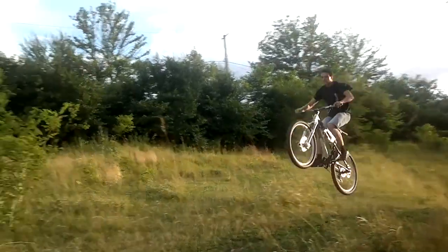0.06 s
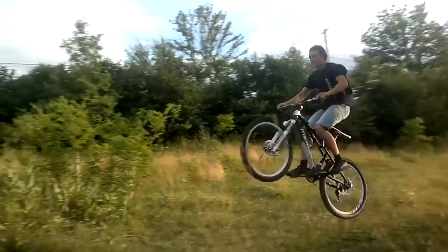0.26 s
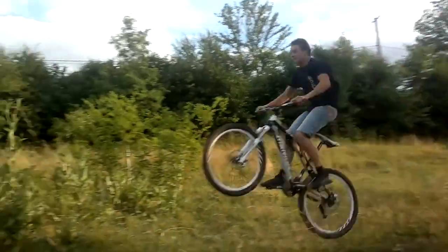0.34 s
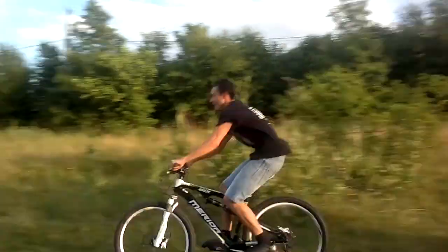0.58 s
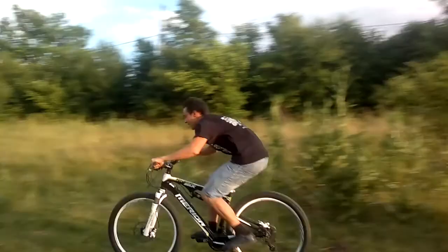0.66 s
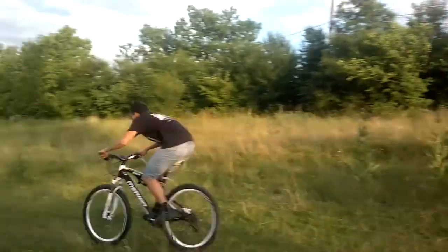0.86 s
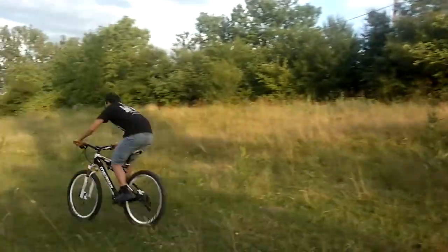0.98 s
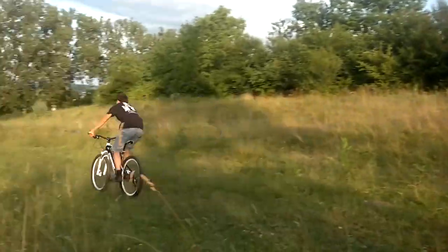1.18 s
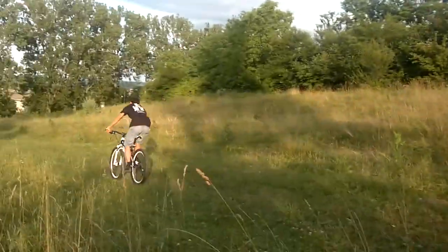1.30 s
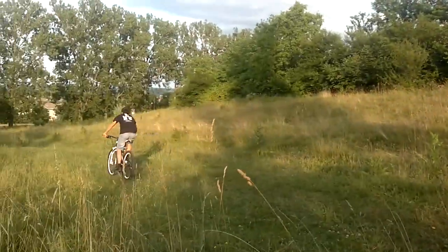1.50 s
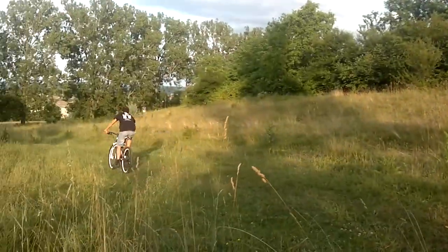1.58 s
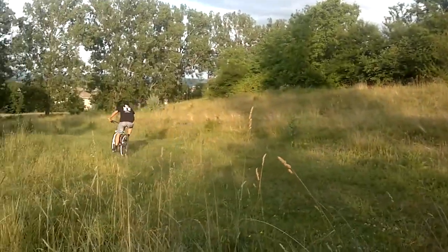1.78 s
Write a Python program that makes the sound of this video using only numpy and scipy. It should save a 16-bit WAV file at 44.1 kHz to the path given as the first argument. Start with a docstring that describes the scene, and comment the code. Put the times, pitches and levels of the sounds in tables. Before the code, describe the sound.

Mountain bike thumping down from a jump, chain jingling and tyres rustling away through grass.

```python
"""In a meadow, a mountain bike lands from a jump close to the microphone and rolls away.
The rear wheel hits with a thump and a hard clack of the frame, and the front follows.
The chain slaps and jingles ever more weakly, and there is one thin, very high squeak.
Knobbly tyres hum and rustle through the grass; wind stirs a hedge and buffets the microphone."""
import sys
import numpy as np
from scipy import signal
from scipy.fft import rfft, irfft, next_fast_len
from scipy.io import wavfile
from scipy.ndimage import uniform_filter1d, map_coordinates

SR = 44100
rng = np.random.default_rng(int(sys.argv[2]) if len(sys.argv) > 2 else 0)


def to_wav(sig):
    """Store sig (one row per channel, or 1-D mono) as 16-bit WAV at the path in sys.argv[1].

    Samples outside -1..1 are clipped; the rate is SR.
    """
    pcm = np.clip(np.atleast_2d(sig), -1, 1) * 32767
    pcm = np.round(pcm).astype(np.int16)
    wavfile.write(sys.argv[1], SR, pcm.T)  # frames by channels


N = 81585


def amp(db):
    """Turn decibels into a number to multiply by."""
    return 10 ** (np.asarray(db) / 20)


def unit(x):
    """Scale x to an average (rms) strength of 1."""
    return x / np.sqrt(np.mean(x ** 2) + 1e-20)


def clock():
    """The time of each sample, in seconds."""
    return np.arange(N) / SR


def loudness(points):
    """A volume curve through (t/s, level/dB) points."""
    times, db = np.transpose(points)
    return amp(np.interp(clock(), times, db))


def flutter(depth_db, per_s):
    """A smooth, random flicker in volume."""
    return amp(depth_db * map_coordinates(rng.standard_normal(400), [clock() * per_s], mode="wrap"))


def filtered(x, response):
    """Multiply each frequency in x by response(hz)."""
    size = next_fast_len(N + SR // 2)
    return irfft(rfft(x, size) * response(np.fft.rfftfreq(size, 1 / SR)), size)[:N]


def coloured(x, tone):
    """Shape x with (f/Hz, gain/dB) points, then scale it to strength 1."""
    f, db = np.transpose(tone)
    return unit(filtered(x, lambda hz: amp(np.interp(np.log(hz + 1), np.log(f), db))))


def fuzzy_tone(hz, width_hz):
    """Noise squeezed into a narrow band, so it has a pitch."""
    return unit(filtered(rng.standard_normal(N), lambda f: 1 / (1 + (2 * (f - hz) / width_hz) ** 2)))


def steadied(x, window_s):
    """Even out the chance swells in a noise."""
    power = uniform_filter1d(x ** 2, max(2, int(window_s * SR)))
    return unit(x / np.sqrt(np.abs(power) + 1e-4))


def crackle(per_s, smooth):
    """Tiny random ticks mixed with a share of smooth noise."""
    ticks = (rng.random(N) < per_s / SR) * rng.standard_normal(N)
    return unit(unit(ticks) + smooth * rng.standard_normal(N))


def burst(start, hold, t60, rise=0.00031):
    """A volume curve that rises, holds, then drops 60 dB every t60 seconds."""
    t = clock() - start
    return np.clip(t / rise, 0, 1) * amp(-60 * np.maximum(t - hold, 0) / t60)


def struck(force, envelope, modes, bright=0):
    """A shaken part rings at its own pitches (modes); bright adds treble, in dB per octave."""
    def response(f):
        body = sum(amp(db) * 1j * f * width / (hz * hz - f * f + 1j * f * width)
                   for hz, width, db in modes)
        return body * amp(bright * np.log2((f + 500) / 6000))
    x = filtered(force, response)
    return x * np.linalg.norm(envelope) / (np.linalg.norm(x) + 1e-12)  # same energy as the envelope


def ring(start, modes):
    """Tapped steel rings with fading pure tones (f/Hz, level/dB, t60/s)."""
    t = np.maximum(clock() - start, 0)
    tones = sum(amp(db - 60 * t / t60) * np.sin(2 * np.pi * hz * t) for hz, db, t60 in modes)
    return tones * (1 - np.exp(-t / 0.00089))


def hiss():
    """A faint, steady hiss behind everything."""
    # tone of the hiss: f/Hz, gain/dB
    tone = [(300, 19), (3500, -1), (7000, -1), (11000, -1), (15000, -10)]
    return amp(-79.5) * coloured(rng.standard_normal(N), tone)


def wind():
    """Moving air rumbles on the microphone, rushes around the flying bike and stirs the hedge."""
    # how loud the gusts, rush and leaves are: t/s, level/dB
    gust_levels = [(0, -76), (.17, -75), (.2, -35), (.25, -36.5), (.335, -44), (.38, -34), (.415, -39.5),
                   (.5, -37), (.545, -50), (.63, -40), (.69, -44), (.76, -48), (.9, -47.5), (.99, -60),
                   (1.15, -58.5), (1.35, -66), (1.62, -60), (1.73, -48.5), (1.79, -59), (1.85, -65)]
    rush_levels = [(0, -55.5), (.09, -52.5), (.15, -46.5), (.23, -52.5), (.45, -51), (.7, -63),
                   (1.1, -72.5)]
    leaf_levels = [(0, -81.5), (1.1, -58.5), (1.53, -61.5), (1.58, -55.5), (1.65, -57.5), (1.74, -62),
                   (1.83, -56)]
    # the tone of each: f/Hz, gain/dB
    gust_tone = [(10, -36), (30, -3.5), (90, -2.5), (150, -19), (250, -29), (600, -37), (2000, -100)]
    rush_tone = [(240, -41), (400, -16), (602, -14.5), (841, 6), (1100, 2.5), (1250, -2.5), (1570, 4.5),
                 (1910, -5), (2190, -11), (2660, -4.5), (3150, -10.5), (3600, -30), (4150, -50),
                 (4600, -21.5), (5770, -62), (15000, -44)]
    leaf_tone = [(300, -27), (680, -16), (1000, -19), (1750, -4.5), (2200, 4), (2600, -4.5), (3000, -13),
                 (3600, -21), (4600, -21.5), (6500, -35), (15000, -38)]
    gusts = steadied(coloured(rng.standard_normal(N), gust_tone), window_s=0.063)
    rush = coloured(rng.standard_normal(N), rush_tone)
    rush = unit(filtered(rush, lambda f: f ** 2 / (f ** 2 + 544 ** 2)))  # thins out below 544 Hz
    leaves = coloured(crackle(per_s=1400, smooth=0.74), leaf_tone)
    return loudness(gust_levels) * gusts + loudness(rush_levels) * rush + loudness(leaf_levels) * leaves


def meadow_echo(x, level_db=-16, t60=0.2):
    """Ground and bushes add a weak, short echo to x."""
    t = np.arange(SR // 2) / SR
    tail = rng.standard_normal(len(t)) * amp(-60 * t / t60)
    return x + amp(level_db) * signal.fftconvolve(x, tail / np.linalg.norm(tail))[:N]


def grass():
    """Stems whip the spokes, dry blades rustle under the wheels and tall grass swishes further off."""
    # how loud the stems, blades and swish are: t/s, level/dB
    stem_levels = [(.46, -72), (.485, -35.5), (.53, -39.5), (.56, -44), (.60, -40), (.65, -43),
                   (.75, -45.5), (.86, -50), (1.0, -51.5), (1.07, -57.5), (1.15, -56), (1.2, -93),
                   (1.85, -100)]
    blade_levels = [(.47, -85.5), (.50, -50.5), (.64, -56), (.76, -54), (.85, -65), (.95, -64), (1.01, -71),
                    (1.06, -87.5)]
    swish_levels = [(0, -101), (.16, -71), (.21, -90), (.255, -65), (.31, -111), (.41, -84), (.46, -71),
                    (1.1, -69), (1.22, -59), (1.35, -65), (1.43, -59.5), (1.6, -72), (1.67, -70.5),
                    (1.75, -86)]
    # the tone of each: f/Hz, gain/dB
    stem_tone = [(1000, -5.5), (2500, 6), (3300, 0.5), (3900, -2), (5000, -1), (6500, -5.5), (7500, -7),
                 (9200, -18.5), (11500, -15), (12500, -34), (15500, -32)]
    blade_tone = [(5000, -34), (8000, -5), (11000, -6), (14000, -8), (16000, -15)]
    swish_tone = [(3000, -70), (4200, -9.5), (5050, 7.5), (5900, -10), (6500, -8), (8500, -26),
                  (15000, -31)]
    stems = flutter(2.5, per_s=69.88) * coloured(crackle(per_s=2500, smooth=1.06), stem_tone)
    blades = coloured(crackle(per_s=3200, smooth=0.61), blade_tone)
    swish = flutter(1.0, per_s=59.6) * coloured(crackle(per_s=2000, smooth=0.99), swish_tone)
    near = loudness(stem_levels) * stems + loudness(blade_levels) * blades
    return near + loudness(swish_levels) * swish


def tyres():
    """The tyres spin, then crush the grass; their knobbly tread hums louder under load."""
    # how loud the rustle and hum are: t/s, level/dB
    rustle_levels = [(.05, -77), (.16, -59.5), (.40, -67), (.47, -40.5), (.52, -36.5), (.555, -43),
                     (.60, -36), (.68, -40), (.79, -44.5), (.98, -45.5), (1.16, -51), (1.38, -52.5),
                     (1.54, -57), (1.635, -57), (1.68, -61), (1.85, -89)]
    hum_levels = [(.05, -82), (.16, -64), (.40, -62.5), (.48, -64), (.62, -47), (.78, -52.5), (.92, -51.5),
                  (1.0, -41), (1.05, -54.5), (1.09, -44), (1.17, -41), (1.24, -53), (1.27, -42.5),
                  (1.38, -54.5), (1.44, -49.5), (1.55, -56.5), (1.63, -52.5), (1.68, -66), (1.77, -55.5),
                  (1.82, -70)]
    # tone of the rustle: f/Hz, gain/dB
    rustle_tone = [(60, -1.5), (150, 4), (230, 2), (400, 6), (540, -1.5), (660, -8.5), (850, 1.5),
                   (1100, 1.5), (1400, -3.5), (1900, -9.5), (2600, -9.5), (3300, -50), (6000, -23),
                   (15000, -94)]
    rustle = flutter(1.1, per_s=45) * coloured(crackle(per_s=800, smooth=0.94), rustle_tone)
    tread = steadied(fuzzy_tone(hz=287.2, width_hz=52), window_s=0.027)
    hum = flutter(1.5, per_s=29.9) * tread
    return loudness(rustle_levels) * rustle + loudness(hum_levels) * hum


def squeak(start=1.406, rise_s=0.0082, fade_db_per_s=145):
    """A thin, very high squeak, like a brake pad brushing its disc."""
    t = np.maximum(clock() - start, 0)
    fade = np.minimum(t / rise_s, 1) * amp(-50 - fade_db_per_s * t)
    return fade * burst(start, hold=0.095, t60=0.076) * fuzzy_tone(hz=15200, width_hz=450)


def chain():
    """Each slap is a quick run of links hitting the steel of the drive."""
    # chain slaps: t/s, level/dB, hold/s, brightness/(dB per octave)
    slaps = [(0.472, -50, 0.002, -2), (0.482, -48, 0.0045, 0), (0.519, -35, 0.0063, -2),
             (0.533, -40, 0.01, 1), (0.5708, -30, 0.0025, -10), (0.5751, -32, 0.0025, -1),
             (0.587, -33.5, 0.019, -1.5), (0.611, -40.5, 0.019, -2), (0.658, -33.5, 0.0023, -12),
             (0.688, -46, 0.0046, 0), (0.717, -41, 0.0026, 7), (0.727, -35.5, 0.0036, -0.5),
             (0.821, -45.5, 0.006, 5), (0.8884, -42.5, 0.0015, -9), (0.901, -44, 0.0039, -3.5),
             (0.969, -42.5, 0.004, -4.5), (0.986, -47, 0.013, -0.5), (1.027, -48.5, 0.0076, -9.5),
             (1.125, -44.5, 0.0029, -13.5), (1.14, -54, 0.013, -3)]
    # where the steel rings: f/Hz, width/Hz, gain/dB
    steel_modes = [(2555, 110, 4.5), (3840, 68, 1), (4490, 57, -1), (5240, 540, 8), (6460, 740, 10),
                   (8010, 540, 4.5), (9160, 510, 5.5), (10850, 200, 3), (14000, 900, -12)]
    out = np.zeros(N)
    for start, db, hold, bright in slaps:
        envelope = burst(start, hold, t60=0.034)
        links = steadied(crackle(per_s=3500, smooth=0.69), window_s=0.0015)
        out += amp(db) * struck(links * envelope, envelope, steel_modes, bright)
    return out


def jingle():
    """Single links and spokes clink, and one struck steel part rings out clearly."""
    # clinks: t/s, level/dB, f/Hz
    clinks = [(.5225, -28, 5070), (0.5748, -24, 4470), (.577, -34, 3765), (.594, -29, 3870),
              (.612, -30, 6430), (.6595, -29.5, 3670), (0.66, -36, 8800), (.7285, -33.5, 11130),
              (.8855, -40, 6350), (.9023, -38.5, 3560), (1.549, -45.5, 4840)]
    # the clear ring: t/s, level/dB
    pings = [(0.9737, -28.5)]
    # its tones: f/Hz, gain/dB, t60/s
    ping_modes = [(5030, -13, 0.046), (6400, 2, 0.033), (6570, -6.5, 0.026), (10880, -14, 0.057)]
    clinking = sum(ring(start, [(hz, db, 0.029)]) for start, db, hz in clinks)
    return clinking + sum(amp(db) * ring(start, ping_modes) for start, db in pings)


def thumps(rise_s=0.004, t60=0.085):
    """Tyres and suspension take each hit with a low, dull note."""
    # thumps: t/s, level/dB, f/Hz
    hits = [(0.427, -23, 81), (0.463, -24, 124.6), (0.502, -33, 93), (0.574, -19, 95), (.661, -29.5, 91),
            (0.885, -29, 102), (1.066, -37, 83), (1.151, -37, 72), (1.521, -37.5, 55)]
    out = np.zeros(N)
    for start, db, hz in hits:
        t = np.maximum(clock() - start, 0)
        envelope = amp(db - 60 * t / t60) * (1 - np.exp(-t / rise_s))
        out += envelope * np.sin(2 * np.pi * hz * t)
    return out


def frame_clacks():
    """The landing and later bumps jolt the frame through soft rubber, which dulls the treble."""
    # jolts: t/s, level/dB, hold/s
    jolts = [(0.462, -23, 0.0065), (0.5735, -32, 0.0065), (0.658, -43.5, 0.012), (1.091, -45.5, 0.012),
             (1.386, -58, 0.0038), (1.568, -55, 0.0064)]
    # where the frame rings: f/Hz, width/Hz, gain/dB
    frame_modes = [(277, 140, 3.5), (450, 180, -2), (902, 78, 11), (1170, 180, -5.5), (1300, 120, 7.5),
                   (1610, 61, 9), (1850, 260, -3), (2390, 180, -3), (2540, 220, 3), (5000, 600, -4)]
    rubber = signal.butter(6, 2830, "lowpass", fs=SR, output="sos")
    out = np.zeros(N)
    for start, db, hold in jolts:
        envelope = burst(start, hold, t60=0.032, rise=0.00078)
        jolt = steadied(crackle(per_s=1400, smooth=0.76), window_s=0.0026)
        force = signal.sosfilt(rubber, jolt * envelope)
        out += amp(db) * struck(force, envelope, frame_modes)
    return out


def scene():
    """Add everything into one channel; only the bike's knocks and jingles echo."""
    impacts = frame_clacks() + thumps() + chain() + jingle()
    return (meadow_echo(impacts) + tyres() + grass() + squeak() + hiss() + wind())[None]


def record(dry, top_hz=15750):
    """Cut away all sound above top_hz."""
    return filtered(dry[0], lambda hz: hz < top_hz)[None]


dry = scene()
out = record(dry)
to_wav(out)
```